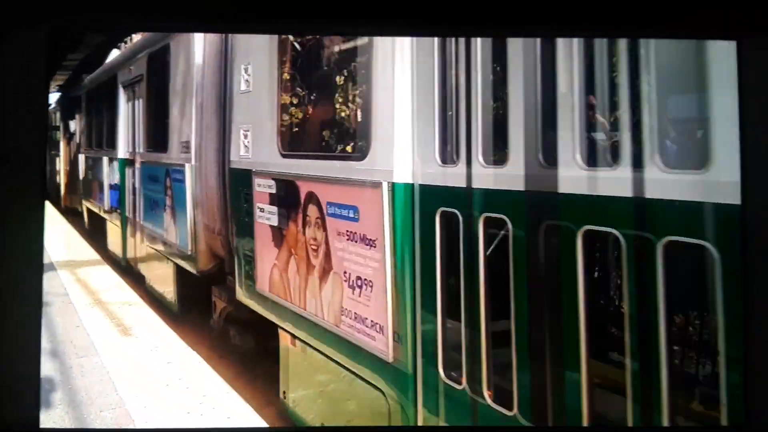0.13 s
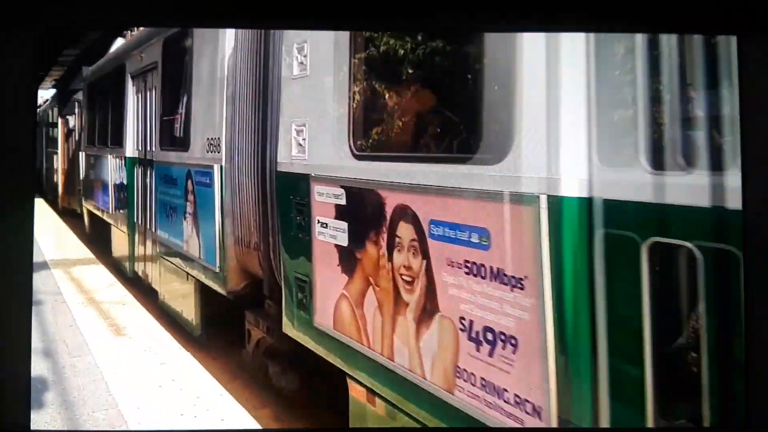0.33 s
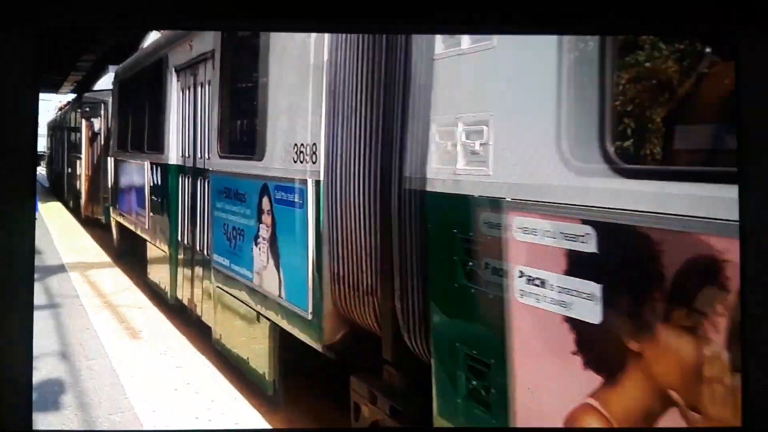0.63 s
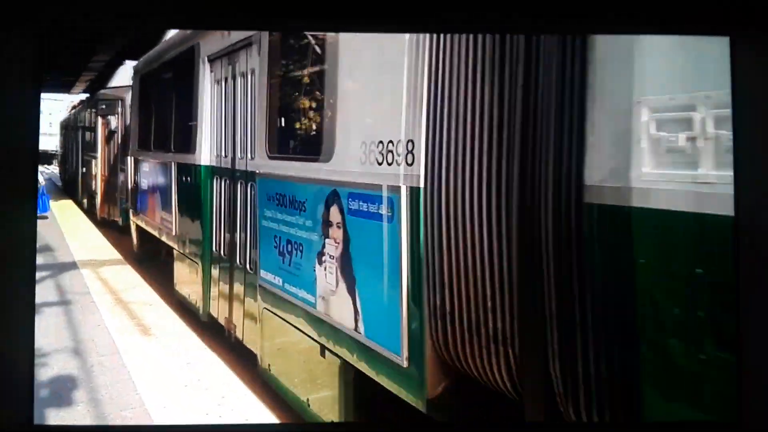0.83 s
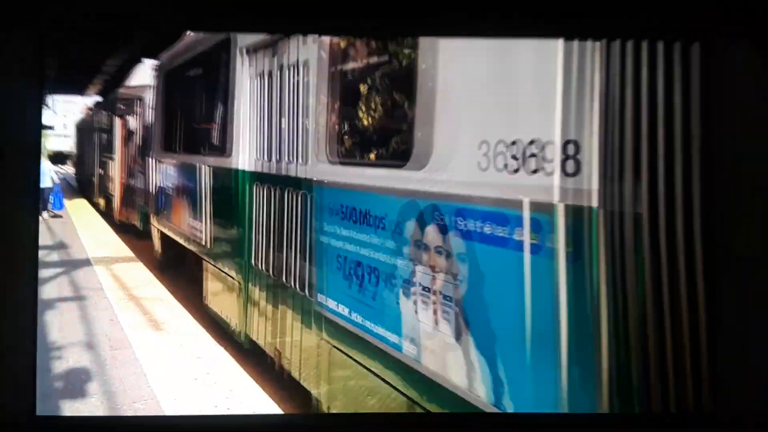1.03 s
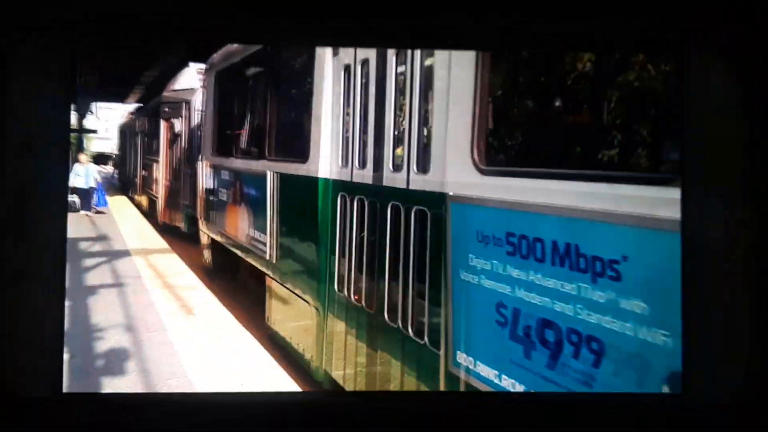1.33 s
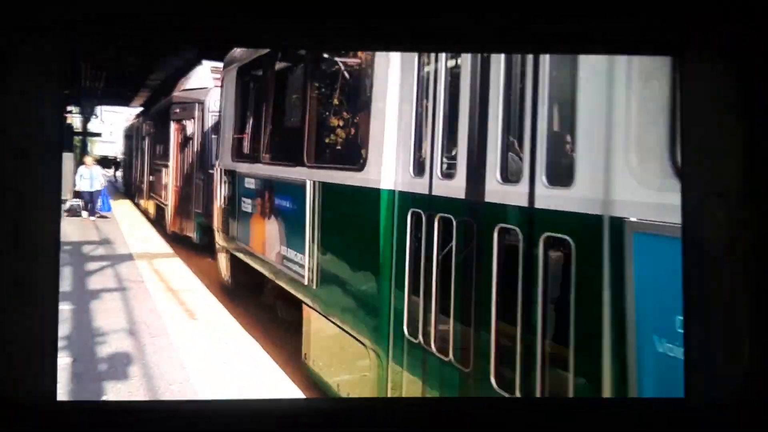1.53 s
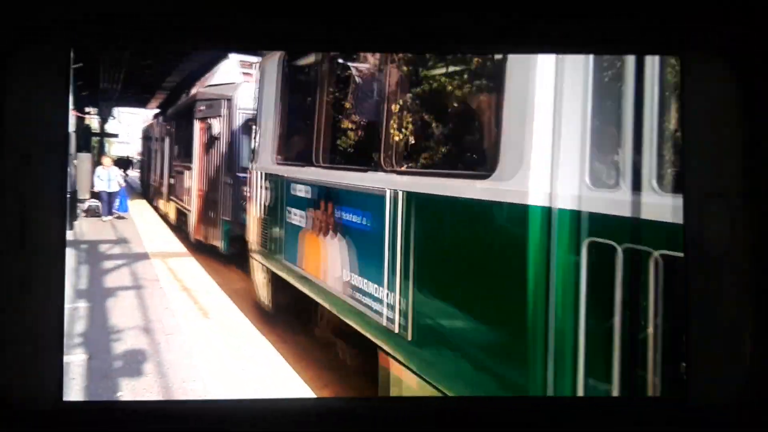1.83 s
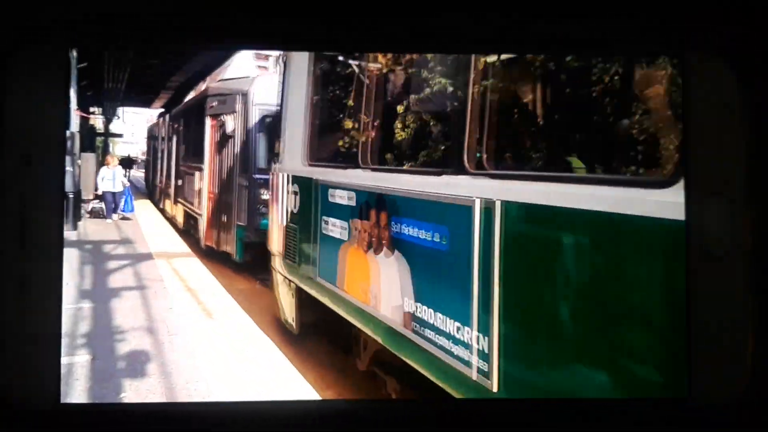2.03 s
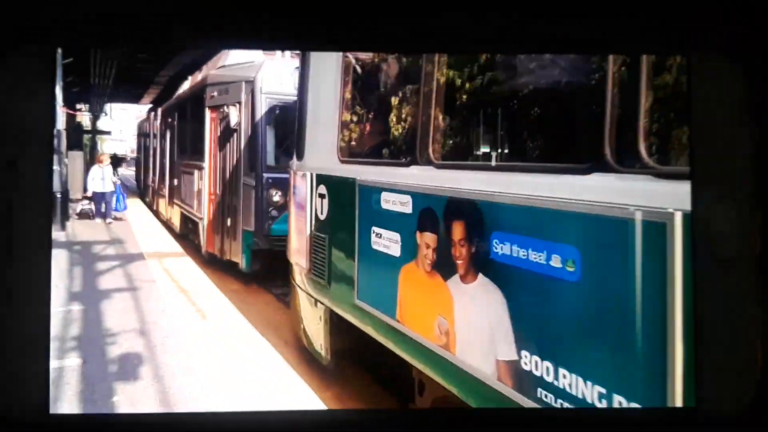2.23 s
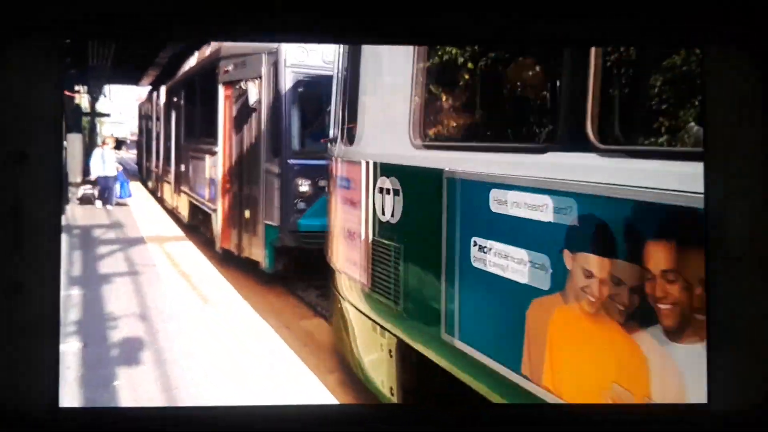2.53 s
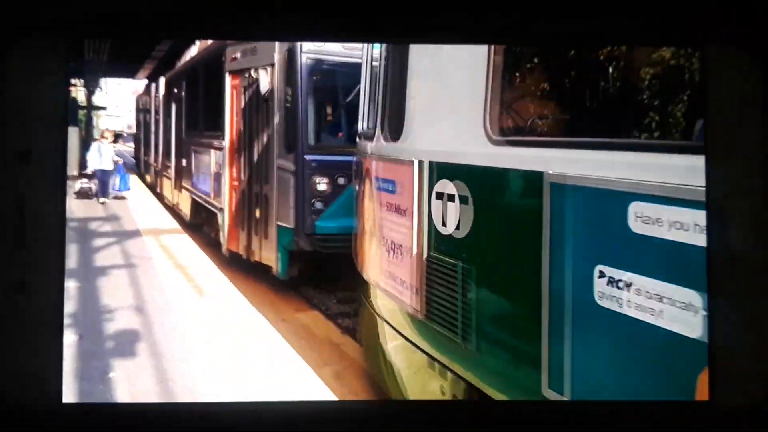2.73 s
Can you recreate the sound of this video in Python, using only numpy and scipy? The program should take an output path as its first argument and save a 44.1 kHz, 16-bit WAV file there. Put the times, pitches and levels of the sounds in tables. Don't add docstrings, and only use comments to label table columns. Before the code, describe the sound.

Piercing wheel squeal from a light-rail train passing close on an open platform. Rolling hiss, body rumble and faint motor hum run throughout, with tiny metallic rings early. At 0.8 s a high, rough squeal erupts, pulsing until about 2.1 s, then weakening. Air blows at 0.95-1.1 s and snaps shut. Wandering higher squeals overlap from 1.4 s; new squeals and chirps rise from 2.5 s to the end.

```python
import sys
import numpy as np
from scipy import signal
from scipy.io import wavfile

SR = 44100
rng = np.random.default_rng(int(sys.argv[2]) if len(sys.argv) > 2 else 0)


def ratio_of_db(decibels):
    return 10 ** (np.asarray(decibels, float) / 20)


def digitize_waveform(pressure):
    field = np.atleast_2d(pressure).T
    bounded = np.clip(field, -1, 1)
    quanta = np.round(bounded * 32767).astype(np.int16)
    wavfile.write(sys.argv[1], SR, quanta)


N = 127449
T = np.arange(N) / SR
OVERTONE_WIDTH_HZ = 650


def rms_one(x):
    return x / np.sqrt(np.mean(np.abs(x) ** 2) + 1e-20)


def in_time(rows):
    s, *columns = np.transpose(rows)
    return [np.interp(T, s, c) for c in columns] + [(T >= s[0]) & (T <= s[-1])]


def at_hz(points, hz):
    table_hz, value = np.transpose(points)
    return np.interp(np.log(hz), np.log(table_hz), value)


def drift(rate_hz):
    r = np.exp(-2 * np.pi * rate_hz / SR)
    white = rng.standard_normal(N + SR)
    return rms_one(signal.lfilter([1], [1, -2 * r, r * r], white)[SR:])


def complex_drift(rate_hz):
    return (drift(rate_hz) + 1j * drift(rate_hz)) * np.sqrt(.5)


def pan(x, db):
    return np.array([x * ratio_of_db(db / 2), x * ratio_of_db(-db / 2)])


def bell(s, length_s):
    return np.exp(-.5 * ((T - s) / length_s) ** 2)


def cut(x, hz, kind, order):
    return signal.sosfilt(signal.butter(order, hz, kind, fs=SR, output="sos"), x)


def resonance(x, hz, width_hz):
    r = np.exp(-np.pi * width_hz / SR)
    poles = [1, -2 * r * np.cos(2 * np.pi * hz / SR), r * r]
    return signal.lfilter([(1 - r * r) / 2, 0, (r * r - 1) / 2], poles, x + 1e-18)


def sing(hz, width_hz, rough):
    rough = np.clip(rough, 0, 1)
    phase = 2 * np.pi * np.cumsum(hz + 0 * T) / SR
    swing = np.sqrt(1 - rough ** 2) + rough * complex_drift(width_hz)
    return np.sqrt(2) * np.real(swing * np.exp(1j * phase))


def banded_noise(spectrum, patchy_db, shared):
    # (frequency [Hz], likeness [0-1])
    likeness = [(40, .75), (110, 0.62), (230, 1), (900, 0.98), (2000, 0.81), (4000, 0.25), (8000, 0.24)]
    # (frequency [Hz], left minus right [dB])
    lean = [(60, 8), (390, .5), (1000, 3), (2550, 2), (6500, -2)]
    out, together = 0, drift(27.0)
    lowest, highest = spectrum[0][0], spectrum[-1][0]
    edges = lowest * 2 ** (np.arange(int(3 * np.log2(highest / lowest)) + 2) / 3)
    white = rng.standard_normal((2, 2, N))
    for k, (low, high) in enumerate(zip(edges, edges[1:])):
        mid, side = cut(white[k % 2], [low, min(high, .45 * SR)], "band", order=3)
        hz = np.sqrt(low * high)
        alike = at_hz(likeness, hz)
        flicker_db = patchy_db * (shared * together + drift(8.9))
        gain = ratio_of_db(at_hz(spectrum, hz) + flicker_db) * pan(1, at_hz(lean, hz))[:, None]
        out = out + gain * (np.sqrt(1 + alike) * mid + np.sqrt(1 - alike) * side * [[1], [-1]])
    return rms_one(out)


def squeal():
    # (time [s], level [dB])
    pressure = [(.78, -82), (.8, -31.5), (.92, -34), (.95, -16), (1.1, -22.5), (1.19, -24.5), (1.22, -37.5),
                (1.29, -32), (1.35, -17.5), (1.45, -35.5), (1.6, -23.5), (1.77, -24), (1.93, -25.5),
                (1.98, -22), (2.065, -15), (2.1, -34), (2.22, -33.5), (2.62, -33)]
    # (distance above the main mode [Hz], width [Hz], level [dB])
    side_modes = [(1, 240, -14), (180, 80, -10), (-205, 80, -17)]
    # (time [s], loss [dB], length [s])
    dips = [
        (0.934, -12.5, 0.0042),
        (1.021, -8, 0.0037),
        (1.123, -16, 0.006),
        (1.758, -19.5, 0.0016),
        (2.55, -4, 0.0069),
        (2.614, -11.5, 0.017),
    ]
    # (time [s], left minus right [dB])
    place = [(.8, -5.5), (1.25, -4.5), (1.33, -8.5), (1.9, -9.5), (2.2, -9)]
    wheel_hz, sag_hz_per_s, width_hz = 4630, 24, 95
    waver_hz, waver_rate_hz = 9, 12
    db, _ = in_time(pressure)
    loss_db = sum(dip_db * bell(s, length_s) for s, dip_db, length_s in dips)
    force = (T > pressure[0][0]) * np.sqrt(ratio_of_db(2 * db) + grips()) * ratio_of_db(loss_db)
    hz = wheel_hz - sag_hz_per_s * T + waver_hz * drift(waver_rate_hz)
    rough = .25 + .042 * (db.max() - db)
    main = force * sing(hz, width_hz / 2, rough)
    sides = sum(ratio_of_db(side_db) * sing(hz + up_hz, wide_hz / 2, 1) for up_hz, wide_hz, side_db in side_modes)
    modes = main + np.sqrt(force * ratio_of_db(db)) * sides
    overtone = ratio_of_db(-47) * sing(2 * hz, OVERTONE_WIDTH_HZ, 1)
    return pan(modes, in_time(place)[0]), force * overtone, force


def grips():
    # (time [s], peak level [dB], rise [s])
    catches = [(0.8025, -10, 0.0047), (0.8598, -22, 0.0054), (0.8804, -18.5, 0.0065),
               (0.917, -18.5, 0.0049), (0.938, -12, 0.0034), (0.9603, -8, 0.0054), (1.0263, -7.5, 0.0045),
               (1.1023, -16.5, 0.0061), (1.1365, -21.5, 0.007), (1.2517, -17, 0.0051),
               (1.2972, -20.5, 0.0098), (1.35, -16, 0.0036), (1.4175, -19, 0.0077), (1.4447, -14.5, 0.0054),
               (1.4658, -20.5, 0.007), (1.5143, -14, 0.0089), (1.5329, -13.5, 0.007), (1.575, -9, 0.0049),
               (1.604, -7, 0.0039), (1.659, -17, 0.0058), (1.6823, -12.5, 0.007), (1.708, -10.5, 0.0085),
               (1.753, -5.5, 0.0045), (1.8294, -16, 0.0098), (1.8843, -22.5, 0.0025),
               (1.911, -17.5, 0.0048), (1.96, -16, 0.018), (1.999, -17, 0.0046), (2.0894, -17.5, 0.0087),
               (2.1407, -15.5, 0.007), (2.213, -30, 0.01), (2.246, -23, 0.012), (2.3218, -23.5, 0.007),
               (2.3662, -23, 0.0053), (2.4094, -16.5, 0.0078), (2.437, -21.5, 0.0078),
               (2.461, -30.5, 0.0061), (2.491, -21.5, 0.007), (2.51, -19.5, 0.0054), (2.5743, -28, 0.007)]
    trim_db = -4.5
    out = np.zeros(N)
    for s, db, rise_s in catches:
        near = np.flatnonzero((T > s) & (T < s + 10 * rise_s))
        age = (T[near] - s) / rise_s
        out[near] += (ratio_of_db(db + trim_db) * age * np.exp(1 - age)) ** 2
    return out


def slides():
    # (time [s], pitch [Hz], level [dB])
    early = [
        [(1.44, 5600, -46.5), (1.5, 5640, -41), (1.62, 5725, -29), (1.7, 5715, -35.5), (1.73, 5650, -38),
         (1.78, 5720, -33.5), (1.83, 5600, -30.5), (1.9, 5600, -36.5), (1.94, 5620, -44)],
        [(1.96, 5760, -48), (1.99, 5757, -34.5), (2.04, 5634, -31.5), (2.12, 5660, -29.5), (2.175, 5730, -34.5),
         (2.27, 5685, -29.5), (2.31, 5600, -32), (2.42, 5600, -37.5), (2.53, 5600, -41.5)],
    ]
    # (time [s], pitch [Hz], level [dB])
    late = [
        [(2.51, 5184, -43), (2.535, 5200, -28), (2.58, 5210, -28), (2.606, 5270, -31), (2.65, 5290, -25),
         (2.72, 5320, -25.5), (2.79, 5420, -27), (2.83, 5345, -27), (2.89, 5500, -40)],
        [(2.79, 5960, -33.5), (2.82, 5900, -30.5), (2.845, 5860, -26), (2.87, 5630, -39)],
        [(2.855, 6400, -38), (2.88, 6240, -32), (2.89, 6270, -30.5)],
        [(2.865, 5040, -45.5), (2.885, 5040, -20.5), (2.89, 5020, -19.5)],
        [(1.27, 5210, -54.5), (1.29, 5150, -30), (1.36, 5170, -53), (1.62, 5250, -55.5), (1.65, 5440, -34),
         (1.7, 5250, -41), (1.9, 5390, -49)],
    ]
    # (left minus right at its start [dB], at its end [dB])
    places = [(11, 7), (11, 17), (-15, -8.5), (11, 12), (-13, -13), (1.5, -14), (-5.5, -3)]
    flange_hz = [5145, 5248, 5322, 5452, 5566, 5640, 5735, 5884]
    flange_width_hz, flange_db = 32.3, 2.5
    width_hz, skirt_hz, skirt_db = 210, 500, -14
    overtone_db = -44 + 10 * (T > 1.5)
    out, high, total = 0, 0, 0
    for rows, ends in zip(early + late, places):
        hz, db, on = in_time(rows)
        tone = sing(hz, width_hz / 2, .9) + ratio_of_db(skirt_db) * sing(hz, skirt_hz / 2, 0.93)
        high = high + on * ratio_of_db(db + overtone_db) * sing(2 * hz, OVERTONE_WIDTH_HZ, 0.81)
        pan_db = np.interp(T, [rows[0][0], rows[-1][0]], ends)
        out = out + pan(on * ratio_of_db(db) * tone, pan_db)
        total = total + on * ratio_of_db(db)
    modes = sum(resonance(out, hz, flange_width_hz) for hz in flange_hz)
    return ratio_of_db(-4.0) * (out + ratio_of_db(flange_db) * modes), high, total


def rings():
    # (middle [s], half length [s], frequency [Hz], level [dB], left minus right [dB])
    caught = [(.03, .04, 3600, -37.5, 17), (.17, 0.026, 3500, -30.5, 11), (.14, .025, 5200, -49, 0),
              (.18, 0.014, 4900, -44, -5), (.32, 0.017, 4740, -32.5, -6), (.36, 0.04, 5210, -42, -5),
              (.46, 0.034, 5160, -33, -2), (.53, .025, 4950, -34, 20), (.54, 0.042, 4530, -33, -5),
              (1.65, 0.061, 5730, -30.5, 6), (1.83, 0.02, 5570, -28, 12), (2, .025, 5740, -28, 3),
              (2.1, 0.05, 5693, -26, 10.5), (2.1, 0.061, 5560, -31, 8), (2.24, 0.067, 5810, -35, 16),
              (2.325, .035, 5530, -28, 12), (2.41, 0.042, 5580, -32, 7), (2.56, 0.039, 5148, -23, -12),
              (2.567, .028, 5260, -20.5, -11), (2.64, 0.03, 5240, -27, -11), (2.63, 0.034, 5330, -26, -6),
              (2.73, 0.033, 5325, -35, -11), (2.76, 0.058, 5455, -28, 18.5), (2.82, .045, 5300, -35.5, -3)]
    width_hz, rough = 28, .5
    out, wobble = np.zeros((2, N)), complex_drift(width_hz)
    for k, (s, half_s, hz, db, pan_db) in enumerate(caught):
        near = np.flatnonzero(abs(T - s) < 2 * half_s)
        own_wobble = wobble[(near + k * SR // 8) % N]
        tone = (np.sqrt(1 - rough ** 2) + rough * own_wobble) * np.exp(2j * np.pi * hz * T[near])
        swell = np.exp(-((T[near] - s) / half_s) ** 4)
        out[:, near] += pan(ratio_of_db(db) * swell * np.sqrt(2) * tone.real, pan_db)
    return out


def rolling():
    # (time [s], level [dB])
    roll_level = [(0, -27), (.75, -28), (.95, -31.5), (1.105, -28.5), (1.125, -39), (1.2, -29.5),
                  (1.23, -35), (1.285, -34.5), (1.33, -31), (1.6, -28.5), (1.9, -28), (1.95, -34),
                  (2.12, -29), (2.19, -29.5), (2.52, -29), (2.6, -39.5), (2.8, -36.5), (2.89, -27.5)]
    # (frequency [Hz], density [dB per Hz])
    roll_colour = [(600, -14), (1120, -3.5), (1810, -4.5), (3480, -4), (4180, -5), (5060, -7), (6000, -14),
                   (7600, -26.5)]
    # (frequency [Hz], density [dB per Hz])
    body_colour = [(25, -36), (70, -38), (150, -52), (250, -4.5), (323, -14.5), (423, 4), (509, 3),
                   (649, -10.5), (1170, -24)]
    # (frequency [Hz], width [Hz], level re roll [dB])
    rail_modes = [(398, 73, -8), (498.6, 74, -10.5), (1308, 100, -16.5), (2032, 100, -15),
                  (2777, 150, -13.5), (3120, 390, -25), (3500, 51, -16), (4900, 730, -6)]
    # (time [s], length [s], frequency [Hz], width [Hz], level [dB])
    grinding = (3, -1.07, 3249, 496, -33.5)
    body_db, body_follows, roll_trim_db = -32, 0.43, 1
    db = in_time(roll_level)[0]
    rail = sum(ratio_of_db(mode_db) * sing(hz, width_hz / 2, 0.96) for hz, width_hz, mode_db in rail_modes)
    body_level = ratio_of_db(body_db + body_follows * (db - db.mean()))
    body = body_level * banded_noise(body_colour, patchy_db=2.14, shared=0.61)
    roll = ratio_of_db(db + roll_trim_db) * (banded_noise(roll_colour, patchy_db=2.44, shared=0.66) + rail)
    s, length_s, hz, width_hz, grind_db = grinding
    return body + roll + ratio_of_db(grind_db) * bell(s, length_s) * sing(hz, width_hz, 0.93)


def bogie():
    hz, width_hz, overtone_db = 5600, 1800, -30.5
    fade = ratio_of_db(-40) * bell(0.28, 0.22)
    overtone = ratio_of_db(overtone_db) * sing(2 * hz, OVERTONE_WIDTH_HZ, 0.95)
    return fade * sing(hz, width_hz, 0.88), fade * overtone


def valve():
    # (time [s], level [dB])
    blast = [
        (.95, -85),
        (.975, -44),
        (1.0, -46.5),
        (1.05, -46),
        (1.105, -47.5),
        (1.116, -63.5),
    ]
    # (frequency [Hz], density [dB per Hz])
    blast_colour = [(1500, -11), (3500, 0), (5500, 6), (6200, 13), (7400, -19.5), (9500, -25), (11500, -10),
                    (13500, -17.5)]
    snap_s, snap_hz, snap_db, snap_length_s = 1.102, 2060, -27, .008
    lift_db, top_hz = 16, 13800
    db, on = in_time(blast)
    ping = ratio_of_db(snap_db) * bell(snap_s, snap_length_s) * np.sin(2 * np.pi * snap_hz * T)
    jet = cut(banded_noise(blast_colour, patchy_db=3.5, shared=0.46), top_hz, "low", order=6)
    return on * ratio_of_db(db + lift_db) * jet + ping


def motors():
    # (frequency [Hz], level [dB rms], width [Hz])
    hum_tones = [(120, -72, 1.5), (259, -46, 14), (518, -40, 12), (778, -52, 16)]
    # (time [s], level [dB])
    whine = [
        (1.25, -52),
        (1.45, -36),
        (1.9, -43),
        (2.3, -35.5),
        (2.55, -38.5),
        (2.65, -55),
    ]
    whine_hz, whine_width_hz = 1011, 14
    knock_s, knock_hz, knock_db, knock_length_s = 2.57, 75, -51, 0.0099
    db, on = in_time(whine)
    hum = sum(ratio_of_db(tone_db) * sing(hz, width_hz, 0.86) for hz, tone_db, width_hz in hum_tones)
    knock = ratio_of_db(knock_db) * bell(knock_s, knock_length_s) * np.sin(2 * np.pi * knock_hz * T)
    return hum + knock + on * ratio_of_db(db) * sing(whine_hz, whine_width_hz, 0.96)


def top_air(force):
    # (frequency [Hz], density [dB per Hz])
    air_colour = [(7800, 3), (9000, 6.5), (11200, -3), (13000, 3), (15000, -26)]
    air_db, scrape_db = -67, -48
    return (ratio_of_db(air_db) + ratio_of_db(scrape_db) * force) * banded_noise(air_colour, patchy_db=3, shared=.4)


def platform(x):
    # (frequency [Hz], width [Hz], depth [0-1])
    notches = [(1867, 68, .6), (2284, 97, 1)]
    # (left delay [s], right delay [s], gain [dB])
    echoes = [(.00027, 0.00034, -15), (.0013, 0.00084, -22.5), (.0022, 0.0024, -46)]
    for hz, width_hz, depth in notches:
        x = x - depth * resonance(x, hz, width_hz)
    out = x.copy()
    for *delays, db in echoes:
        for side, s in enumerate(delays):
            out[side] += ratio_of_db(db) * np.interp(T - s, T, x[side], left=0)
    return out


def scene():
    ring, ring_high, force = squeal()
    slid, slid_high, slip = slides()
    hiss, hiss_high = bogie()
    below = cut(ring + slid + rings() + rolling() + hiss + motors(), 6770, "low", order=8)
    overtones = pan(ring_high + slid_high + hiss_high, -2.5)
    return platform(below + valve() + top_air(force + slip) + overtones)


def band_limit(x):
    return signal.sosfilt(signal.butter(12, 15700, fs=SR, output="sos"), x)


def record(dry):
    heard = cut(dry, 90, "high", order=2)
    return band_limit(heard)


dry = scene()
out = record(dry)
digitize_waveform(out)
```